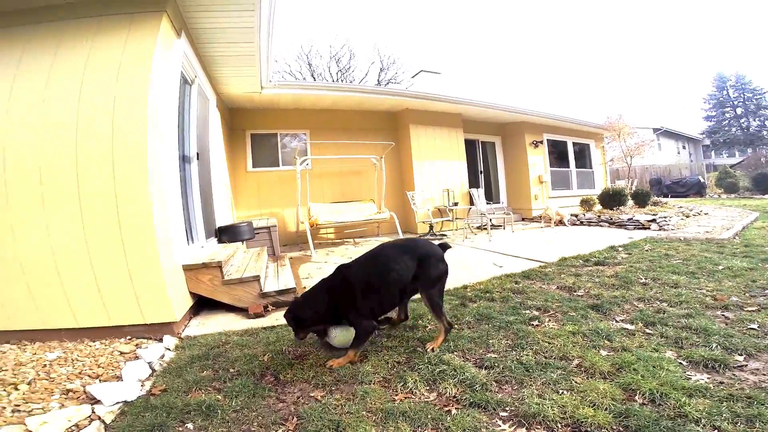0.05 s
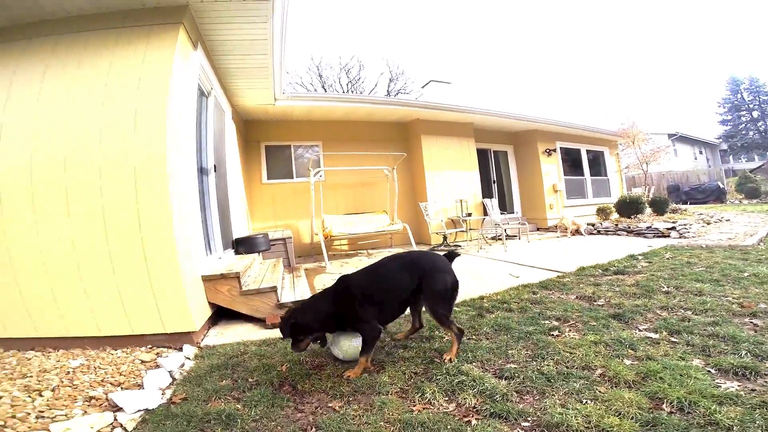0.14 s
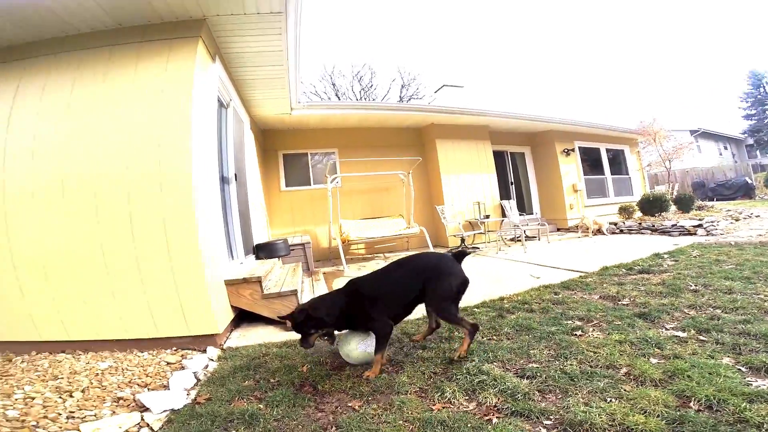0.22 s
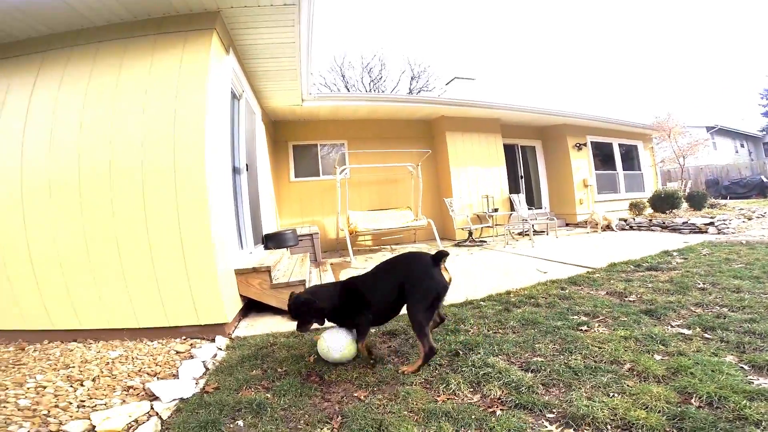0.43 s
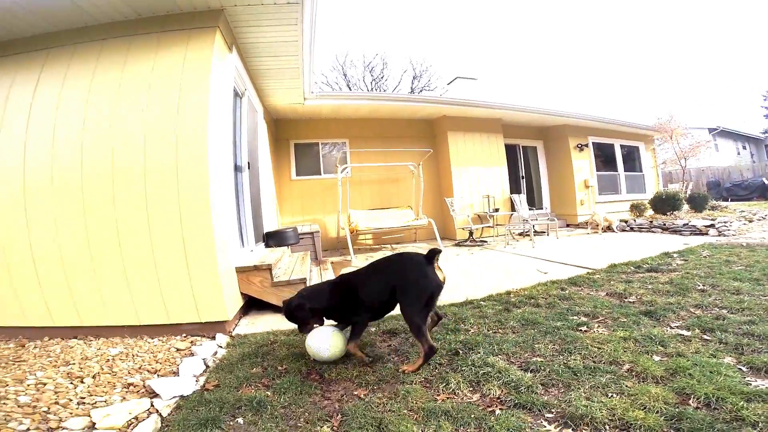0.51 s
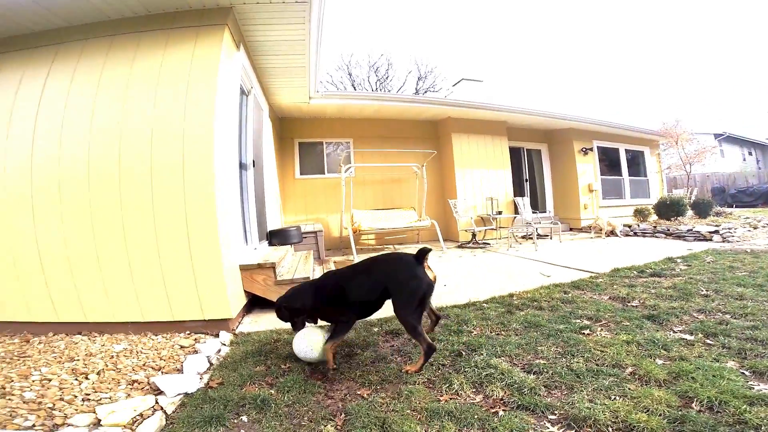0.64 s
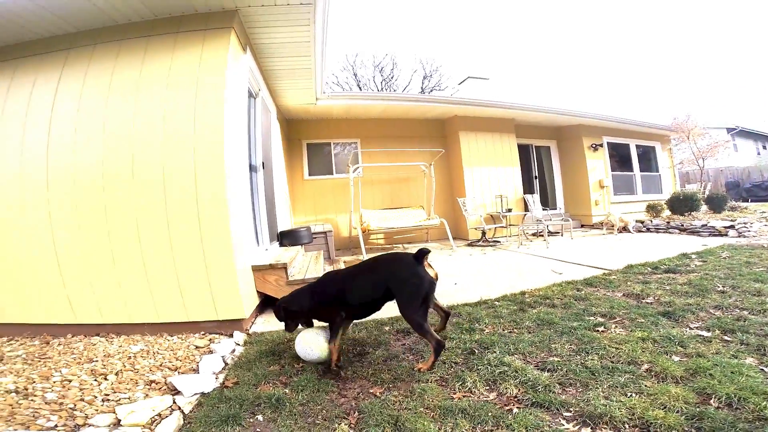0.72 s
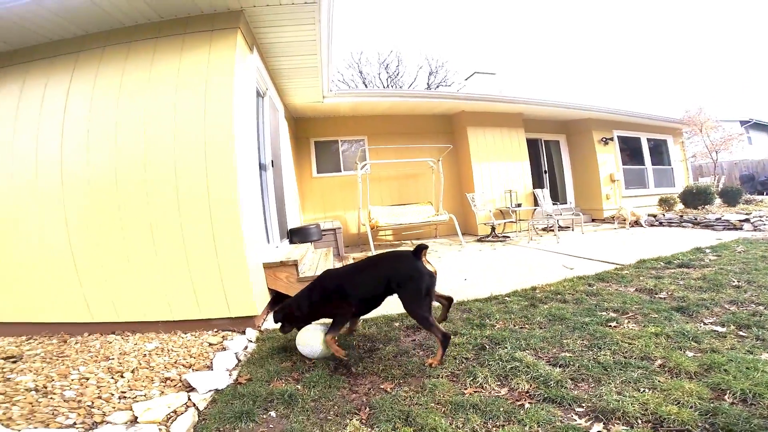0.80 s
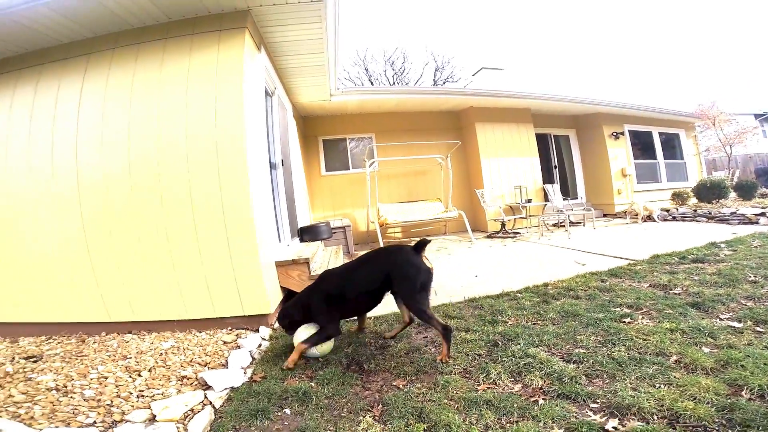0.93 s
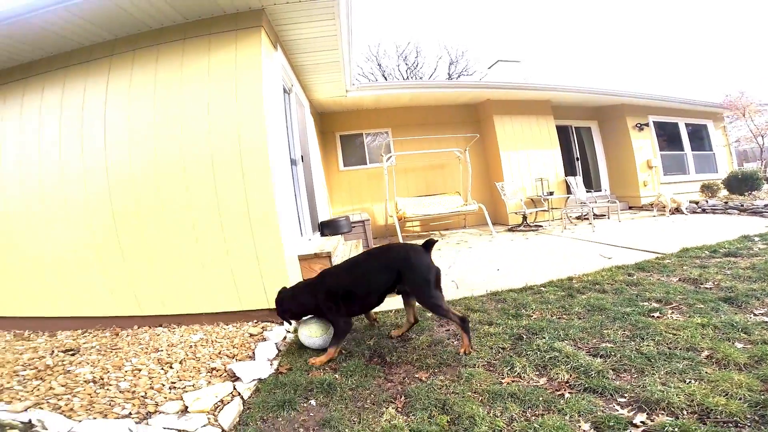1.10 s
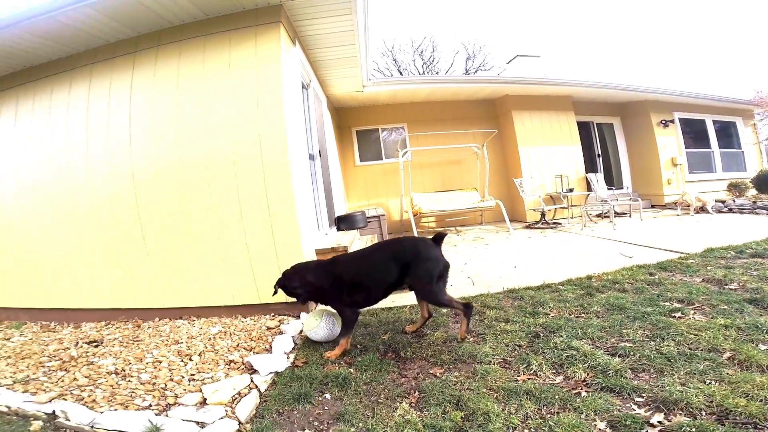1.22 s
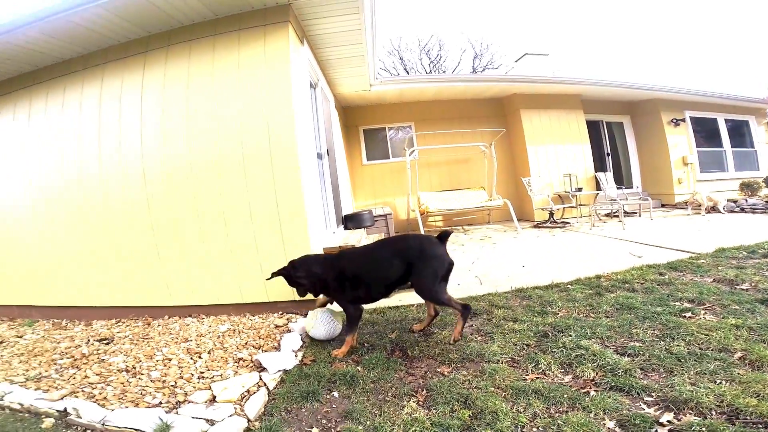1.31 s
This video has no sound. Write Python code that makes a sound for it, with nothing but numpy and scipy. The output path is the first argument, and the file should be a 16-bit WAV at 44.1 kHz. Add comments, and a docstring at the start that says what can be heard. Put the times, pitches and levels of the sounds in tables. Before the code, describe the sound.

A dog's teeth knock sharply and scrape on a hollow plastic ball at about 0.3 seconds, with a low boom from inside it. A weaker knock and scrape follow at 0.4 seconds. A softer boom comes at 0.7 seconds, then tiny squeaks around 1 second. Grass rustles faintly under the ball, and light outdoor wind and handling rumble run throughout.

```python
"""A dog shoves a hollow hard-plastic ball over a lawn beside a house.
Light wind and handling rumble on the microphone from the start, and grass rustles under the ball.
Then teeth knock and skid on the shell twice in quick succession: the shell rings, the air inside
booms and the walls answer faintly. A softer boom follows, and the last tiny squeaks and rustles
fade into the wind."""
import sys
import numpy as np
from scipy import signal
from scipy.fft import rfft, irfft, next_fast_len
from scipy.io import wavfile
from scipy.ndimage import map_coordinates

SR = 44100
rng = np.random.default_rng(int(sys.argv[2]) if len(sys.argv) > 2 else 0)


def unload_audio(sound):
    """Save the sound as a 16-bit wav file, at the path given as the first command line argument."""
    columns = np.transpose(np.atleast_2d(sound))
    # keep every value between -1 and 1, then stretch to whole-number steps
    steps = np.round(np.clip(columns, -1, 1) * 32767)
    wavfile.write(sys.argv[1], SR, steps.astype(np.int16))


N = 59535

# tone colour of the outdoor hiss: f/Hz, level/dB
HISS_COLOUR = [(120, -36), (200, -0.5), (326, -1.5), (377, -2.5), (477, -3), (615, -4.5), (778, -5.5),
               (1000, -8), (2190, -11.5), (2390, -11.5), (4590, -17), (5120, -18), (15200, -32.5)]
# tone colour of the wind and handling rumble: f/Hz, level/dB
RUMBLE_COLOUR = [(12, -27), (20, 5), (31, -1.5), (48, -7.5), (112, -5.5), (155, -15.5), (186, -13.5),
                 (211, -21), (300, -21.5), (390, -42), (660, -120)]
# how the rumble swells and sinks: t/s, level/dB
RUMBLE_SWELL = [(0, -53.5), (.15, -54.5), (.36, -45.5), (0.561, -52.5), (.88, -55), (1.15, -51),
                (1.35, -58.5)]
# how long the walls echo (t60 is the time to fade by 60 dB): f/Hz, t60/s
ECHO_FADE = [(200, 0.24), (2000, 0.26), (6000, 0.25), (12000, 0.6)]
# ball and paws brushing the grass: t/s, length/s, level/dB
RUSTLES = [(0.124, 0.056, -61.5), (0.188, 0.0032, -46), (0.208, 0.054, -52.5), (0.216, 0.029, -55),
           (0.397, 0.049, -50.5), (0.465, 0.098, -63), (0.689, 0.017, -59.5), (0.957, 0.032, -62)]
# tone colour of the grass: f/Hz, level/dB
GRASS_COLOUR = [(200, 13), (600, 3), (1100, 7.5), (2300, 7.5), (3200, -2.5), (4100, 1.5), (5200, -9.5),
                (6400, -1.5), (7600, -27), (14000, -31)]
# air booming in the ball: t/s, level/dB, f/Hz, t60/s
BOOMS = [(0.119, -49.5, 113.6, 0.47), (0.227, -24.5, 94, 0.12), (.279, -30.5, 130.2, 0.49),
         (0.339, -36, 126.2, 0.17), (.378, -32.5, 113.2, 0.34), (0.428, -44.5, 114, 0.11),
         (0.694, -33, 95.6, .11), (0.729, -40.5, 118.2, 0.23)]
# faint squeaky rubs on the shell: t/s, length/s, level/dB
SQUEAKS = [(.412, .012, -47), (0.704, 0.0034, -52), (0.959, 0.0057, -60), (1.005, 0.0088, -63.5)]
# the notes the shell rings at: f/Hz, level/dB, t60/s
SHELL_NOTES = [(1149, -24, .08), (1322, -25, .06), (1609, -17, .06), (1751, -13, .06), (1890, -6, .05),
               (2397, -2, .045), (2529, -11, .045), (2739, -11, .045), (3290, -21, .025), (4200, -20, .03),
               (4625, -21, .03), (5340, -21, .02), (5700, -24, .02), (6760, -24, .02)]
# tone colour of teeth on plastic: f/Hz, level/dB
TOOTH_COLOUR = [(200, -14.5), (550, -15.5), (900, -10.5), (1250, -6), (1550, 1.5), (1850, 4), (2150, -2.5),
                (2400, 3), (2750, -0.5), (3100, -12.5), (4400, -11), (5500, -18), (6600, -20),
                (7800, -32.5), (12500, -38), (15500, -58)]
# teeth skidding on the shell: t/s, length/s, level/dB, brightness/(dB per octave), midrange boost/dB
SKIDS = [(0.2677, 0.013, -21.5, 3.5, 5.5), (.276, 0.0069, -24.5, 2.5, -3), (0.284, 0.016, -32, 0, 3.5),
         (0.3, 0.019, -32, -1, 7.5), (0.307, 0.0039, -40.5, 7.5, 7), (0.359, 0.016, -48.5, 2, 6),
         (0.372, 0.0037, -39, 2, -2), (0.3756, .027, -30, 0, -4), (0.389, 0.0085, -28.5, -0.5, -15)]
# teeth striking the shell: t/s, level/dB
KNOCKS = [(0.1926, -53.5), (0.2248, -53), (0.2665, -20), (0.275, -15.5), (0.3104, -35), (0.3782, -46),
          (0.3892, -37)]

RUB_ATTACK_S, RUB_T60_S = 0.00078, 0.021  # for both squeaks and skids


def amp(db):
    """Turn decibels into a gain to multiply by."""
    return 10 ** (np.asarray(db) / 20)


def unit(x):
    """Scale a sound to an average (rms) strength of 1."""
    return x / np.sqrt(np.mean(x ** 2) + 1e-20)


def along(points, hz):
    """Read between (Hz, value) points, with octaves evenly spaced."""
    f, v = np.transpose(points)
    return np.interp(np.log(hz + 1), np.log(f + 1), v)


def since(start):
    """Seconds since the start, zero before it."""
    return np.maximum(np.arange(N) / SR - start, 0)


def filtered(x, response):
    """Turn each frequency up or down by the gain response(hz)."""
    size = next_fast_len(N + SR // 2)
    return irfft(rfft(x, size) * response(np.fft.rfftfreq(size, 1 / SR)), size)[:N]


def resonance(hz, centre, width):
    """A gain that peaks at one frequency."""
    return 1 / (1 + (2 * (hz - centre) / width) ** 2)


def coloured(x, colour, tilt_db=0, mid_db=0, mid_hz=910, mid_octaves=0.33):
    """Give a sound a tone colour, a tilt per octave and a midrange boost, at strength 1."""
    def response(hz):
        octave = np.log2((hz + 1) / mid_hz)
        boost_db = mid_db * np.exp(-(octave / mid_octaves) ** 2)
        return amp(along(colour, hz) + tilt_db * octave + boost_db)
    return unit(filtered(x, response))


def clicks(per_s):
    """Tiny clicks at random times."""
    return np.sign(rng.standard_normal(N)) * (rng.random(N) < per_s / SR)


def wobble(per_s):
    """A smooth curve through per_s random values a second."""
    points = rng.standard_normal(int(N * per_s / SR) + 4)
    return map_coordinates(points, [np.arange(N) * per_s / SR])


def stroke(start, length, attack_s, t60_s):
    """A loudness shape that rises, holds, then fades."""
    return (1 - np.exp(-since(start) / attack_s)) * amp(-60 * since(start + length) / t60_s)


def wind(hiss_db=-60.5, rumble_db=-0.5):
    """Faint outdoor hiss lies over an uneven rumble of wind and handling."""
    hiss = amp(hiss_db + 0.35 * wobble(per_s=5.17)) * coloured(rng.standard_normal(N), HISS_COLOUR)
    swell_db = np.interp(np.arange(N) / SR, *np.transpose(RUMBLE_SWELL)) + wobble(per_s=13.2)
    rumble = amp(rumble_db + swell_db) * coloured(rng.standard_normal(N), RUMBLE_COLOUR)
    return hiss + rumble


def wall_echo(x, level_db=-29.5, delay_s=0.03):
    """The house walls send back a faint, short echo."""
    hz, t, noise = signal.stft(rng.standard_normal(SR // 2), SR, nperseg=256)
    fade = amp(-60 * t / along(ECHO_FADE, hz)[:, None])
    tail = signal.istft(noise * fade, SR, nperseg=256)[1]
    delayed = np.pad(x, (int(delay_s * SR), 0))
    return amp(level_db) * signal.fftconvolve(delayed, tail / np.linalg.norm(tail))[:N]


def grass():
    """Blades crackle as the ball and paws slide over them."""
    pressure = sum(amp(db) * stroke(start, length, attack_s=0.002, t60_s=0.13)
                   for start, length, db in RUSTLES)
    return pressure * coloured(clicks(per_s=3000), GRASS_COLOUR)


def thud(at_s=0.272, level_db=-16, width_s=0.0023):
    """One low push comes with the hardest knock, then a softer rebound."""
    t = np.arange(N) / SR - at_s
    push = np.exp(-(t / width_s) ** 2)
    rebound = amp(-8) * np.exp(-((t - 0.021) / 0.0045) ** 2)  # 21 ms later, about twice as long
    return amp(level_db) * (rebound - push)


def booms(overtone_ratio=1.7, overtone_db=-17):
    """The air in the hollow ball hums low after each shove."""
    out = np.zeros(N)
    for start, db, hz, t60 in BOOMS:
        phase = 2 * np.pi * hz * since(start)
        hum = np.sin(phase) + amp(overtone_db) * np.sin(overtone_ratio * phase)
        out += amp(db) * stroke(start, 0, attack_s=0.0036, t60_s=t60) * hum
    return out


def squeaks(pitch_hz=2256, width_hz=270):
    """A light rub makes the shell sound only around one pitch."""
    tone = unit(filtered(rng.standard_normal(N), lambda hz: resonance(hz, pitch_hz, width_hz)))
    return tone * sum(amp(db) * stroke(start, length, RUB_ATTACK_S, RUB_T60_S)
                      for start, length, db in SQUEAKS)


def skids(ring_db=0.5, width_hz=67):
    """Teeth slip in many tiny jerks, so the shell rasps, most strongly at its own notes."""
    def shell_response(hz):
        peaks = sum(amp(db / 2) * resonance(hz, note_hz, width_hz) for note_hz, db, _ in SHELL_NOTES)
        return 1 + amp(ring_db) * peaks
    slips = filtered(clicks(per_s=9000), shell_response)
    out = np.zeros(N)
    for start, length, db, tilt_db, mid_db in SKIDS:
        shifted = np.roll(slips, rng.integers(N))  # each skid gets its own stretch of slips
        rasp = coloured(shifted, TOOTH_COLOUR, tilt_db, mid_db)
        out += amp(db) * stroke(start, length, RUB_ATTACK_S, RUB_T60_S) * rasp
    return out


def knocks(contact_s=0.0008, ring_db=1, scatter_db=4, crack_db=-9.5, crack_t60_s=0.05):
    """Each tooth hit makes a sharp crack and sets the shell's notes ringing."""
    out = np.zeros(N)
    for start, db in KNOCKS:
        t = since(start)
        ring = np.zeros(N)
        for k, (hz, note_db, t60) in enumerate(SHELL_NOTES):
            struck_db = note_db + scatter_db * rng.standard_normal()
            direction = (-1) ** k  # neighbouring notes start by swinging opposite ways
            ring += direction * amp(struck_db - 60 * t / t60) * np.sin(2 * np.pi * hz * t)
        noise = coloured(rng.standard_normal(N), TOOTH_COLOUR, tilt_db=0.5)
        crack = noise * amp(crack_db - 60 * t / crack_t60_s)
        rise = 1 - np.exp(-t / contact_s)
        out += amp(db) * rise * (amp(ring_db) * ring + crack)
    return out


def scene():
    """Add all the sounds into one channel; only the shell's sounds get an echo."""
    shell = knocks() + skids() + squeaks()
    return (shell + wall_echo(shell) + booms() + thud() + grass() + wind())[None]


def record(dry):
    """Cut off the very highest treble."""
    top_hz = 15337
    return filtered(dry[0], lambda hz: hz < top_hz)[None]


dry = scene()
out = record(dry)
unload_audio(out)
```